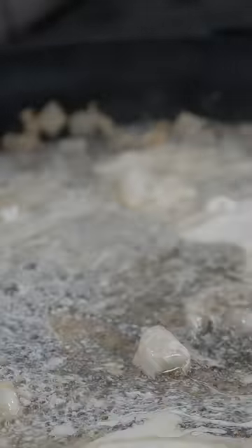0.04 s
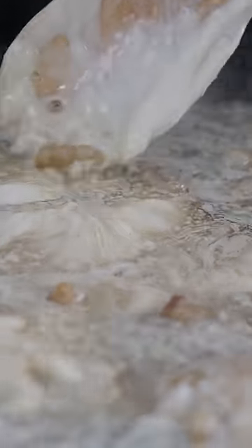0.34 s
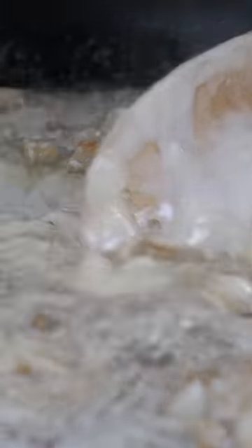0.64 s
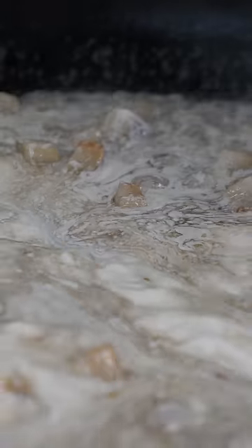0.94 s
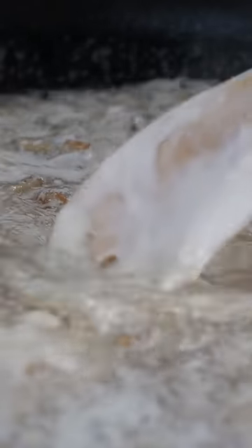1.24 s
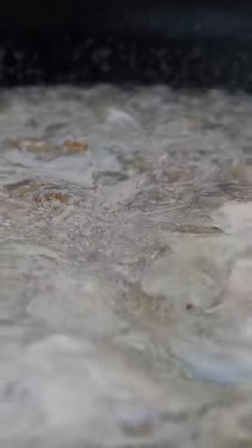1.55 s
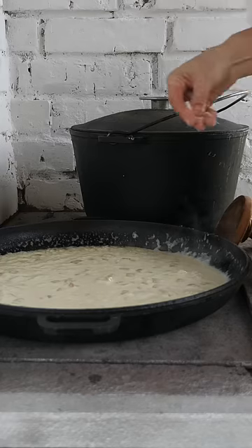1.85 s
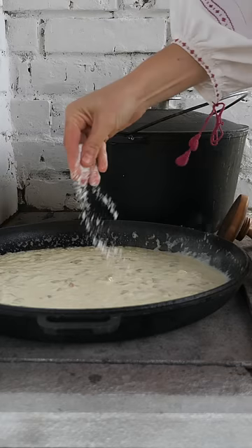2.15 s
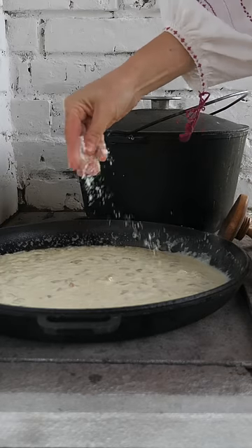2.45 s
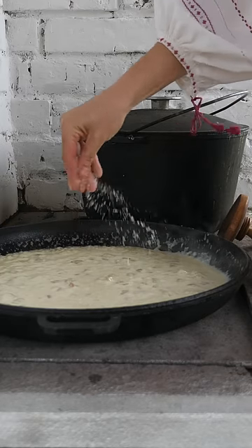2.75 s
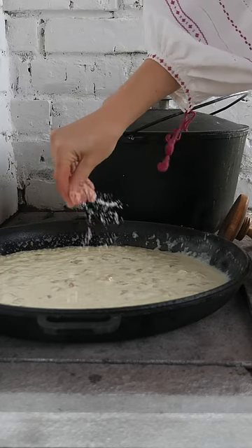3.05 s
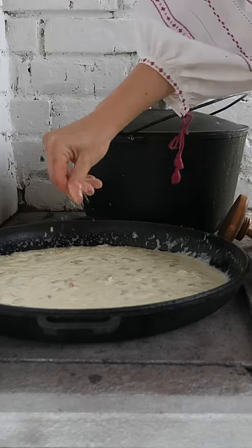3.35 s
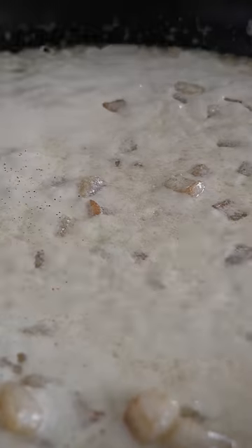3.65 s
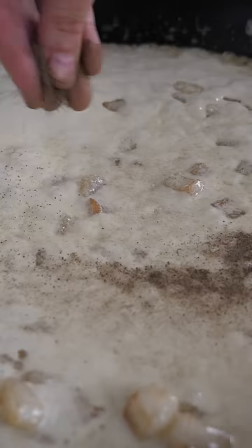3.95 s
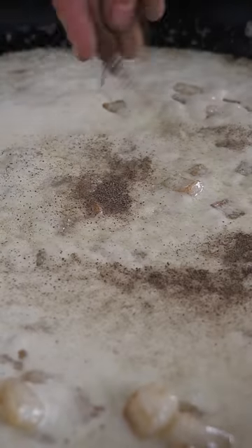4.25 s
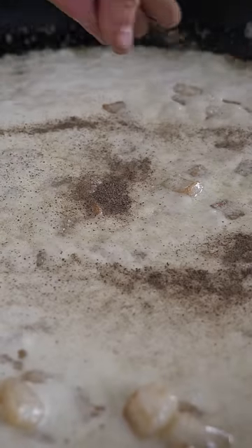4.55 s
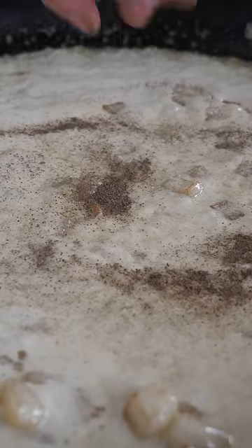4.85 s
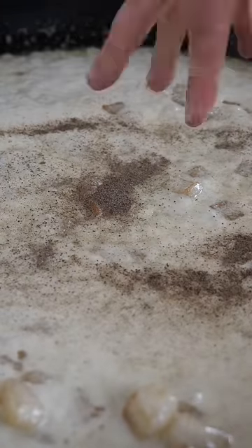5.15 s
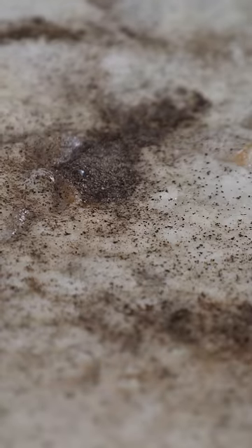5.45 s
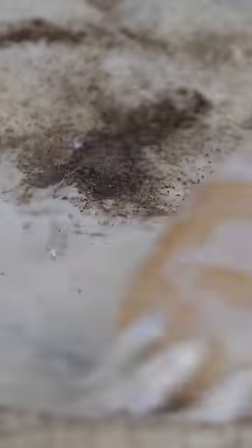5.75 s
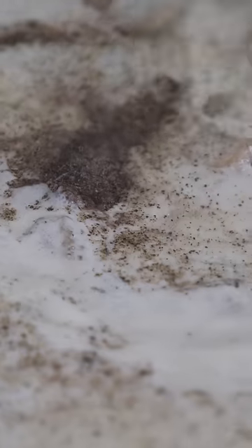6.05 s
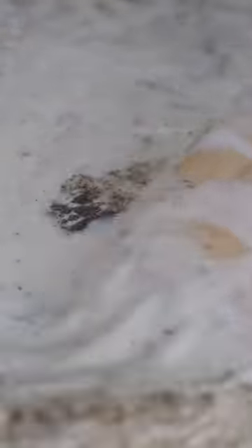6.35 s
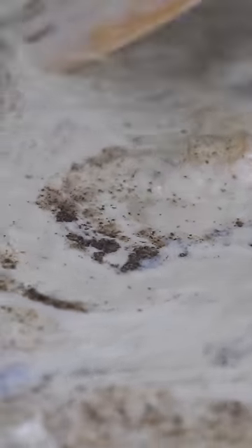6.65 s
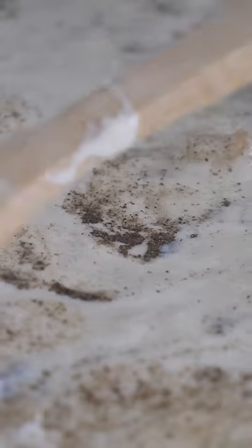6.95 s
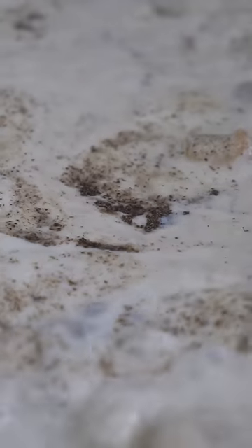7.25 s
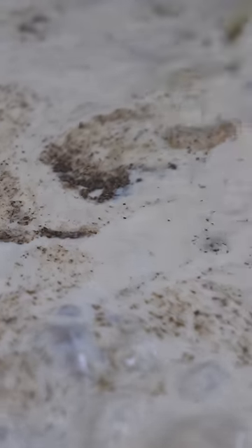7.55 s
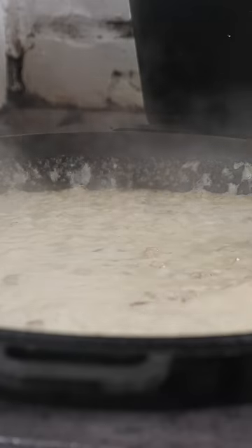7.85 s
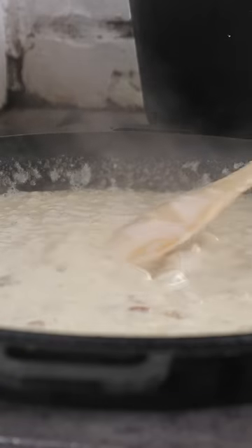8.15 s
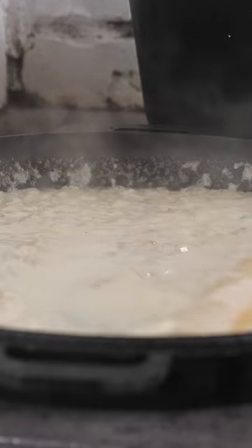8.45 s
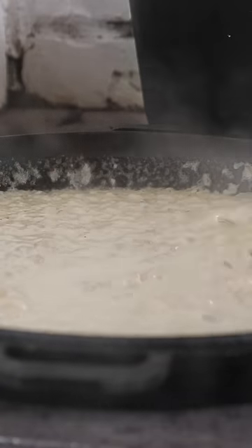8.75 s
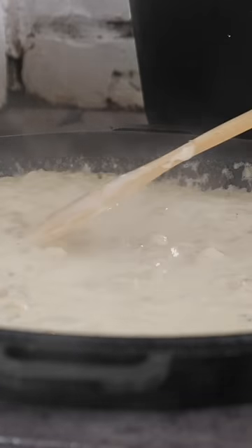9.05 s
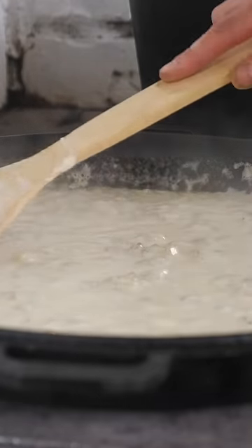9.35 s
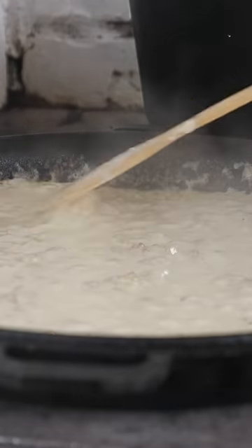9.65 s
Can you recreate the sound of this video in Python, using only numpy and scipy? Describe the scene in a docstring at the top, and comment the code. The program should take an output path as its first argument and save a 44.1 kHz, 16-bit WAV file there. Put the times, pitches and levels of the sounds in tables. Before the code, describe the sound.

Sauce sizzles loudly in a pan, then simmers quietly with faint seasoning sprinkles and a wooden spatula knocking and stirring wetly.

```python
"""A kitchen, close to the stove. Cream sauce fries hard in an iron pan, its water flashing to steam, then the
scene changes to a quiet simmer of tiny bursting bubbles. Fingers grind salt and pepper over it and a sleeve
rustles. A wooden spatula knocks on the iron and judders through the sauce; one heavy blow rocks the pan. A low
room rumble and a draught lie underneath, with a few faint bird-like chirps."""
import sys
import numpy as np
from scipy import signal
from scipy.fft import rfft, irfft, next_fast_len
from scipy.io import wavfile
from scipy.ndimage import uniform_filter1d, map_coordinates

SR = 44100
rng = np.random.default_rng(int(sys.argv[2]) if len(sys.argv) > 2 else 0)


def wrap_up_sound(samples):
    """Save the sound to the file named by the first command line argument, as 16-bit audio."""
    columns = np.atleast_2d(samples).T
    # keep every value between -1 and 1, then stretch to whole-number steps
    tamed = np.clip(columns, -1, 1)
    steps = np.round(tamed * 32767).astype(np.int16)
    wavfile.write(sys.argv[1], SR, steps)


N = 427769


def amp(db):
    """Decibels to gain."""
    return 10 ** (np.asarray(db) / 20)


def unit(x):
    """Scale to rms 1."""
    return x / np.sqrt(np.mean(x ** 2) + 1e-20)


def noise():
    """White noise of rms 1."""
    return rng.standard_normal(N)


def wobble(rate):
    """A smooth random curve, rate knots a second."""
    knots = rng.standard_normal(int(N * rate / SR) + 4)
    return map_coordinates(knots, [np.arange(N) * rate / SR])


def arch(length, skew):
    """A smooth swell; skew over 1 puts its top late."""
    return np.sin(np.pi * np.linspace(0, 1, int(length * SR)) ** skew)


def spells(rows, glide_s=0.029):
    """A curve for each column after the start time: a value holds, then glides to the next row's."""
    starts, *columns = np.transpose(rows)
    current = np.searchsorted(starts[1:], np.arange(N) / SR)
    return [uniform_filter1d(column[current], int(glide_s * SR)) for column in columns]


def add(track, start, sound):
    """Mix a sound into a track at a time in seconds."""
    part = track[round(start * SR):][:len(sound)]
    part += sound[:len(part)]


def filtered(x, response):
    """Filter x by a function of frequency."""
    size = next_fast_len(len(x) + SR // 4)
    return irfft(rfft(x, size) * response(np.fft.rfftfreq(size, 1 / SR)), size)[:len(x)]


def coloured(x, points):
    """EQ x through (Hz, dB) points, rolling off steeply above the last; rms 1."""
    point_hz, point_db = np.transpose(points)

    def response(hz):
        db = np.interp(np.log(hz + 1), np.log(point_hz), point_db, left=-120)
        return amp(db - 40 * np.log2(np.maximum(hz / point_hz[-1], 1)))
    return unit(filtered(x, response))


def clicks(rate, spread_db):
    """Impulses at random times with log-normal sizes, rms 1."""
    impulses = (rng.random(N) < rate / SR) * np.sign(noise())
    return unit(impulses * amp(spread_db * np.clip(noise(), -2.5, 2.5)))


def crackle(rate, spread_db, t60):
    """Random snaps, each a tiny dying puff of noise, rms 1."""
    decay = amp(-120 / (t60 * SR))
    energy = signal.lfilter([1], [1, -decay], clicks(rate, spread_db) ** 2)
    return unit(np.sqrt(energy) * noise())


def narrow(pitch_hz, q):
    """Noise ringing around a moving pitch; it forgets its phase after q cycles."""
    cycles = np.cumsum(pitch_hz) / SR
    a, b = (map_coordinates(rng.standard_normal(N // 4), [cycles / q]) for _ in range(2))
    return a * np.cos(2 * np.pi * cycles) + b * np.sin(2 * np.pi * cycles)


def bursts(rate, pitch_hz, scatter, cycles, spread_db, splash, size=256):
    """Bursting bubbles: each swells, rings a few cycles and splashes around its own pitch; rms 1."""
    draws = rng.standard_normal((int(rate * N / SR), 2))
    starts = rng.integers(0, N, len(draws))
    hz = np.minimum(pitch_hz * np.exp(scatter * draws[:, :1]), SR / 2)
    gain = amp(spread_db * np.minimum(draws[:, 1:], 2))
    turns = hz * np.arange(size) / SR
    spatter = uniform_filter1d(rng.standard_normal(turns.shape), size=13, axis=1)
    attack, fade = 1 - np.exp(-turns), np.linspace(1, 0, size) ** 2
    envelope = attack * (np.exp(-turns / cycles) + splash * spatter) * fade
    rings = gain * np.sin(2 * np.pi * turns) * envelope
    positions = starts[:, None] + np.arange(size)
    return unit(np.bincount(positions.ravel(), rings.ravel(), N)[:N])


def reflected(x, t60, wet_db):
    """x with a short diffuse answer from the kitchen surfaces."""
    t = np.arange(SR // 3) / SR
    tail = rng.standard_normal(len(t)) * amp(-60 * t / t60)
    return x + amp(wet_db) * signal.fftconvolve(x, tail / np.linalg.norm(tail))[:N]


def room_tone():
    """An uneven low rumble and a draught on the microphone."""
    # Spells of background. Each row: start in seconds, rumble in dB, draught in dB.
    levels = [(0, -52, -67), (1.782, -54.5, -68), (3.64, -51.5, -58), (5.6, -52.5, -65), (6.6, -49.5, -63),
              (7.62, -54, -77)]
    # Tone of each layer. Each row: frequency in Hz, relative level in dB.
    rumble_eq = [(35, -17), (65, -9), (100, 1), (135, -3.5), (200, -15), (350, -29)]
    draught_eq = [(12, -10), (25, -2), (55, -2), (120, -38)]
    rumble_db, draught_db = spells(levels)
    rumble = amp(rumble_db + 3.0 * wobble(12)) * coloured(noise(), rumble_eq)
    draught = amp(draught_db + 3.3 * wobble(6.2)) * coloured(noise(), draught_eq)
    return rumble + draught


def chirping():
    """Faint sliding whistles with a fuzzy edge."""
    # Each row: start and length in seconds, level in dB, first and last pitch in Hz.
    chirps = [(1.802, 0.058, -47, 4640, 3920), (2.393, 0.067, -47.5, 3260, 3080),
              (2.91, 0.097, -50, 3600, 3550), (3.027, 0.0453, -48.5, 4630, 4260),
              (4.02, 0.054, -51, 3590, 3700), (9.484, .075, -58, 3200, 3500)]
    level, pitch_hz = np.zeros(N), np.zeros(N)
    for start, length, db, from_hz, to_hz in chirps:
        swell = arch(length, skew=0.65)
        add(level, start, amp(db) * swell)
        add(pitch_hz, start, np.linspace(from_hz, to_hz, len(swell)))
    whistle = np.sin(2 * np.pi * np.cumsum(pitch_hz) / SR)
    return level * (0.48 * whistle + 1.16 * narrow(pitch_hz, q=14))


def rubbing(rubs, eq, grain_rate, skew):
    """A grainy hiss of friction, one swell for each rub."""
    pressure = np.zeros(N)
    for start, length, db in rubs:
        add(pressure, start, amp(db) * arch(length, skew))
    grains = clicks(grain_rate, spread_db=6.5) + 0.81 * noise()
    return pressure * coloured(grains, eq)


def hands():
    """Soft, even rubs of salt between fingers and one later sleeve rustle; brighter rubs of pepper."""
    # Each row: start and length in seconds, level in dB. The last soft rub is the sleeve.
    soft_rubs = [(2.13, 0.11, -48), (2.27, 0.12, -46.5), (2.41, .13, -50.5), (2.58, .15, -47.5),
                 (2.75, 0.2, -50), (2.93, .15, -46), (3.09, 0.11, -49), (3.25, 0.16, -47.5),
                 (3.46, 0.14, -57.5), (5.35, 0.21, -47)]
    pepper_rubs = [(3.96, 0.2, -52), (4.19, 0.076, -55), (4.46, 0.096, -40.5), (4.615, 0.044, -42),
                   (4.77, 0.048, -50), (4.85, 0.08, -39), (5.115, 0.062, -41)]
    # Hiss of the rubs. Each row: frequency in Hz, relative level in dB.
    soft_eq = [(1000, -38), (2300, 1), (3400, 0), (4900, 4.5), (6200, -1), (10000, -3), (15500, -10.5)]
    pepper_eq = [(2000, -9), (4500, -4), (7500, 0), (10000, 0), (12000, -2), (14000, 0), (16000, -2)]
    salt_and_sleeve = rubbing(soft_rubs, soft_eq, grain_rate=4700, skew=0.94)
    pepper = rubbing(pepper_rubs, pepper_eq, grain_rate=5400, skew=2.1)
    return salt_and_sleeve + pepper


def pan_body(force):
    """A force on the pan heard through its damped resonances."""
    # Modes of the iron. Each row: centre and width in Hz, gain in dB.
    modes = [(169, 130, -15), (294, 50, 1), (390, 70, 1.5), (650, 137, 0.5), (1000, 180, -2),
             (1337, 134, -1), (1705, 130, -4), (2050, 190, -7.5), (2520, 200, -10.5), (4020, 1600, -21)]
    return filtered(force, lambda f: sum(
        (-1) ** k * amp(db) * 1j * f * width / (hz * hz - f * f + 1j * f * width)
        for k, (hz, width, db) in enumerate(modes)))


def stick_slip(rate, unevenness, spread_db, t60):
    """Strength of friction, rms 1: sudden slips at an uneven rate, each dying away."""
    count = np.floor(np.cumsum(rate * np.exp(unevenness * wobble(rate))) / SR)
    slips = np.diff(count, prepend=0) * amp(spread_db * np.clip(noise(), -1.6, 1.6))
    return unit(signal.lfilter([1], [1, -amp(-60 / (t60 * SR))], slips))


def pushes():
    """Force, grit and hollow pitch of the spatula: each push touches down, leans in, eases and lifts."""
    # Each row: start and length in seconds, force in dB, place of the hardest moment from 0 to 1,
    # first and settled pitch of the wet hollow behind the blade in Hz, grit in dB relative to the force.
    strokes = [(.45, 0.091, -32.5, 0.72, 1320, 1400, -5), (.975, .09, -32.5, 0.5, 1254, 1550, -6),
               (1.639, 0.14, -34.5, 0.92, 1400, 1700, -4), (3.648, .2, -42.5, 0.06, 1240, 1200, -17),
               (3.975, .11, -41.5, 0.27, 839, 780, -34), (5.695, 0.11, -26.5, 0.46, 580, 650, -11),
               (5.997, .215, -28.5, 0.33, 679, 821, -9), (6.223, 0.18, -37.5, 0.73, 1547, 1450, -7),
               (6.729, 0.17, -35.5, 0.46, 1650, 703, -16), (6.872, 0.12, -35, 0.65, 620, 428, -12),
               (7.65, 0.18, -43, 0.01, 330, 420, -34), (8.03, .095, -36.5, 0.22, 1444, 1297, -12),
               (8.109, .225, -38, 0.24, 539.6, 699.5, -6.5), (8.331, 0.11, -39, 0.73, 733, 700, -6.5),
               (8.698, 0.29, -39, 0.34, 1102, 1080, -14), (9.049, 0.053, -48.5, 0.7, 742, 744, -14),
               (9.326, .08, -55, .5, 1400, 1400, -1)]
    touch_share, ease_db = 0.23, 8  # share of the lead-in spent touching down; drop at either end
    release_s, settle_s = 0.0057, 0.03
    force, grit, hollow_hz = np.zeros(N), np.zeros(N), np.zeros(N)
    for start, length, db, hardest, first_hz, settled_hz, grit_db in strokes:
        t = np.arange(int(length * SR)) / SR
        touch, lift = t / (touch_share * hardest * length), (length - t) / release_s
        contact = np.clip(np.minimum(touch, lift), 0, 1)
        push = contact * amp(db - np.interp(t / length, [0, hardest, 1], [ease_db, 0, ease_db]))
        add(force, start, push)
        add(grit, start, amp(grit_db) * push)
        glide_hz = settled_hz + (first_hz - settled_hz) * np.exp(-t / settle_s)
        hollow_hz[round(start * SR):][:len(t)] = glide_hz
    return force, grit, hollow_hz


def scraping():
    """The spatula judders: slips ring the iron, grit scratches, a hollow squelches, trapped air bursts."""
    # Tone of the grit. Each row: frequency in Hz, relative level in dB.
    grit_eq = [(1200, -17), (2300, -4), (3000, 1), (4500, 1), (5600, -4.5), (8000, -9.5), (15000, -35)]
    force, grit, hollow_hz = pushes()
    judder = stick_slip(rate=150, unevenness=0.45, spread_db=-1.0, t60=0.039)
    iron = amp(-4) * unit(pan_body(judder * noise()))
    # A large, low hollow rings loudly and damps the high bubbles.
    smallness = np.sqrt(np.maximum(hollow_hz, 300) / 1000)
    sloshing_hz = hollow_hz * np.exp(0.08 * wobble(40))  # the pitch wanders as the sauce moves
    squelch = amp(-6) / smallness * narrow(sloshing_hz, q=5.5) * uniform_filter1d(judder, size=120)
    bubbles = bursts(rate=500, pitch_hz=1946, scatter=0.265, cycles=5.2, spread_db=5, splash=0, size=600)
    air = amp(-1) * smallness * bubbles
    scratch = amp(-2.5) * coloured(judder * noise(), grit_eq)
    # Most air is squeezed out where the stroke is both hard and gritty.
    return force * (iron + squelch) + grit * scratch + np.sqrt(force * grit) * air


def knocking():
    """The spatula knocks on the pan with a short wet splutter; hard blows wake its upper modes."""
    # Each row: start in seconds, peak of the ring in dB, hardness in dB (-13.5 leaves the upper modes
    # as they are), bright crack in dB relative to that peak.
    knocks = [(0.512, -19.5, -10, -13.5), (0.983, -20, -4, -16), (1.003, -27, -9, -12),
              (1.018, -16, 0, -15), (1.051, -26, 5, -16), (3.983, -31, -22, -11.5), (5.311, -34.5, -7, -11),
              (5.671, -36, -9, -1.5), (5.697, -11.5, -17, -27), (5.814, -12.5, -11.5, -24),
              (5.828, -17, -18, -13), (5.88, -25, -12, -21), (5.902, -17, -6, -15.5),
              (5.928, -19.5, -21, -20.5), (6.384, -21, -14, -28), (6.731, -26, 0, -18),
              (6.974, -22.5, -27, -14), (7.258, -38.5, -8, -3), (8.457, -39.5, -11, 1.5),
              (8.534, -24.5, -19, -19), (8.612, -30.5, -9, -20), (8.654, -29, -15, -28),
              (8.738, -31.5, -2, -14), (9.604, -31.5, -19, 0)]
    # Tone of the crack. Each row: frequency in Hz, relative level in dB.
    crack_eq = [(1800, -0.5), (3300, 4), (5500, 3), (9000, -2), (15000, -17)]
    firm_db = -20.5  # the sauce cushions contacts lighter than this
    out, t = np.zeros(N), np.arange(SR // 8) / SR
    strike = SR // 500  # the strike sounds 2 ms after the row's start
    crack_decay = (t >= t[strike]) * amp(-60 * (t - t[strike]) / 0.053)
    splutter = 0.061 * (t >= t[strike // 2]) * amp(-60 * t / 0.07)
    for start, db, hard_db, crack_db in knocks:
        force = splutter * rng.standard_normal(len(t))
        force[strike] += min(amp(db - firm_db), 1)
        ring = filtered(pan_body(force), lambda hz: amp((hard_db + 13.5) * np.clip(hz / 600 - 1.2, 0, 1)))
        crack = coloured(rng.standard_normal(len(t)), crack_eq) * crack_decay
        add(out, start, amp(db) * ring / np.abs(ring).max() + amp(db + crack_db) * crack)
    return out


def thump():
    """One heavy blow rocks the pan on the stove top; the slowest motion radiates no sound."""
    # The blow: start in seconds, gain in dB.
    blow = (5.7385, -6.5)
    # Modes of the pan on the stove. Each row: frequency in Hz, relative level in dB, t60 in seconds.
    modes = [(150.7, 1.5, 0.048), (298, -3, 0.031), (477.5, -4, 0.02), (710, -1, 0.036), (965, -9, 0.023)]
    start, gain_db = blow
    out, t = np.zeros(N), np.arange(SR // 4) / SR
    ring = sum(amp(db - 60 * t / t60) * np.sin(2 * np.pi * hz * t) for hz, db, t60 in modes)
    low_cut = signal.butter(2, 100, "highpass", fs=SR, output="sos")
    add(out, start, amp(gain_db) * signal.sosfilt(low_cut, ring))
    return out


def popping():
    """Large bubbles and spits of fat swell for a few cycles and ring briefly, roughened by the splash."""
    # Each row: start in seconds, level in dB, pitch in Hz, t60 in seconds.
    pops = [(0.336, -14.5, 8240, 0.0032), (1.144, -28.5, 2250, 0.042), (1.194, -18, 2100, 0.027),
            (1.21, -21.5, 2060, 0.042), (1.364, -25, 4500, 0.01), (1.378, -19, 3580, 0.0085),
            (1.384, -21, 3040, 0.012), (2.172, -32.5, 9600, 0.0093), (3.57, -49, 5000, 0.0068),
            (7.231, -26, 6700, 0.0037), (7.28, -31, 7460, 0.012)]
    out, t = np.zeros(N), np.arange(SR // 10) / SR
    for start, db, hz, t60 in pops:
        splash = filtered(rng.standard_normal(len(t)), lambda f: 1 / np.sqrt(1 + (f / (2 * hz)) ** 4))
        envelope = amp(db - 60 * t / t60) * (1 - np.exp(-hz * t / 2.7))
        add(out, start, envelope * (1.57 * np.sin(2 * np.pi * hz * t) + 0.5 * unit(splash)))
    return out


def simmering():
    """Small bubbles burst as separate high ticks over a soft seething."""
    # Spells of simmering. Each row: start in seconds, seething in dB, ticks in dB.
    levels = [(1.782, -53.5, -56.5), (3.64, -48.5, -54.5), (5.68, -47.5, -51), (7.75, -50.5, -51.5),
              (9.0, -54.5, -54)]
    # Tone of the seething. Each row: frequency in Hz, relative level in dB.
    seethe_eq = [(150, 5.5), (210, 0), (300, 4), (480, 1.5), (720, 3), (960, 2.5), (2000, -3.5),
                 (4000, -5.5), (8000, -17), (15500, -23)]
    seethe_db, tick_db = spells(levels)
    seethe_gain = amp(seethe_db + 0.19 * wobble(4.5))
    seethe = coloured(noise() + 0.52 * clicks(rate=500, spread_db=9), seethe_eq)
    ticks = bursts(rate=640, pitch_hz=8620, scatter=0.309, cycles=1.55, spread_db=5.5, splash=0.4)
    return seethe_gain * seethe + amp(tick_db) * ticks


def frying():
    """Water flashes to steam in hot fat: dense crackle, a fine spray, single spits and a low hum."""
    # Tone of the sizzle and the spray. Each row: frequency in Hz, relative level in dB.
    sizzle_eq = [(150, -10), (230, -10), (400, -6), (650, -6), (1000, -4.5), (1400, -1.5), (2000, -1),
                 (2600, -2), (3800, -.5), (5200, -8.5), (6700, -9), (8000, -15.5), (9300, -11.5),
                 (15500, -20)]
    spray_eq = [(2500, -16), (5000, 4), (6500, 4), (8000, 2), (9500, 3.5), (12000, 1), (15500, 2)]
    t = np.arange(N) / SR
    sizzle_db = -37 + 4.5 * np.exp(-t / 0.12)  # a brief flare as the sauce meets the fat
    spray_db = -35 - 13 * t  # dies down as the pan cools
    snaps = crackle(rate=1800, spread_db=1.5, t60=0.0079) + 0.54 * clicks(rate=900, spread_db=2.5)
    sizzle = amp(sizzle_db) * coloured(snaps, sizzle_eq)
    spray = amp(spray_db) * coloured(crackle(rate=1200, spread_db=1.5, t60=0.0037), spray_eq)
    spits = bursts(rate=290, pitch_hz=9950, scatter=0.3, cycles=1.6, spread_db=7.5, splash=0.56)
    hum = amp(-54 + wobble(5.1)) * unit(np.sin(2 * np.pi * 63 * t))
    return sizzle + spray + amp(-46.5) * spits + hum


def scene():
    """Frying, then simmering, with the cook's hands and spatula close by; mono."""
    fry_end_s = 1.782
    hot = np.arange(N) / SR < fry_end_s
    sauce = np.where(hot, frying(), simmering()) + popping()
    rubs = hands()
    spatula = scraping() + knocking()
    spatula_and_chirps = reflected(spatula + chirping(), t60=0.11, wet_db=-10)
    return (sauce + rubs + thump() + spatula_and_chirps + room_tone())[None]


def record(dry):
    """A brick-wall low-pass takes off the very top."""
    top_hz = 15900
    return filtered(dry[0], lambda hz: hz < top_hz)[None]


dry = scene()
out = record(dry)
wrap_up_sound(out)
```